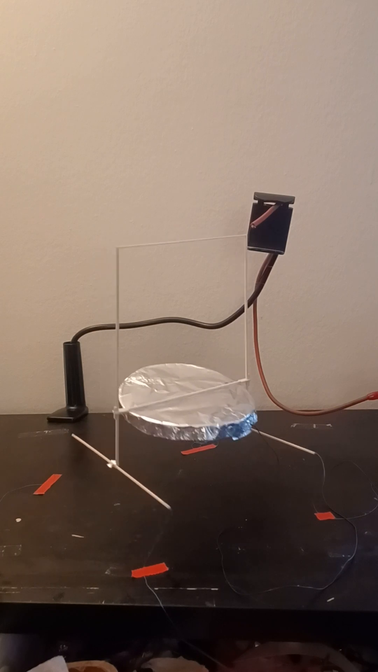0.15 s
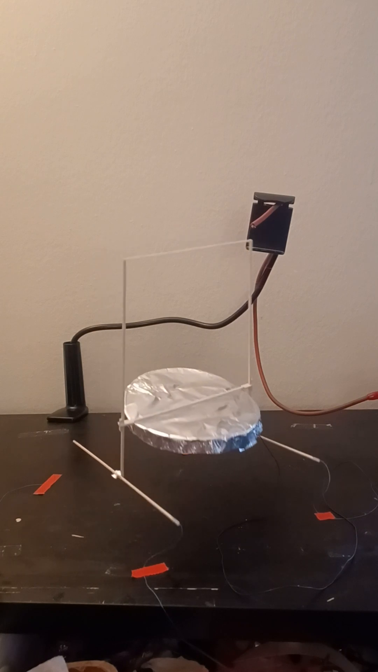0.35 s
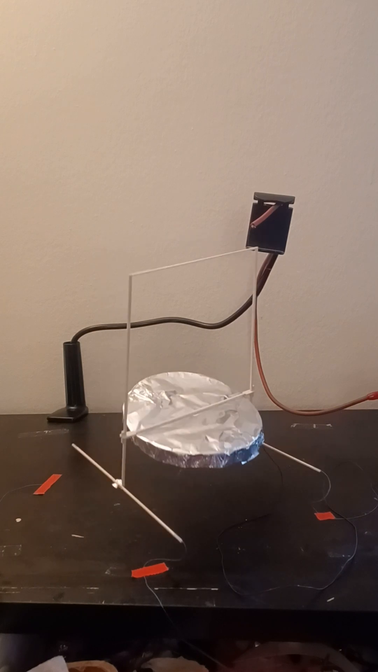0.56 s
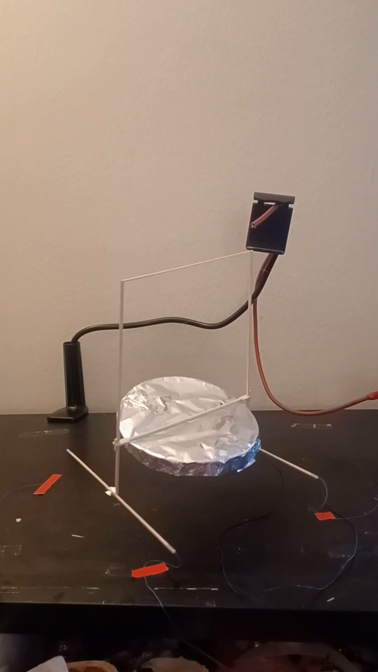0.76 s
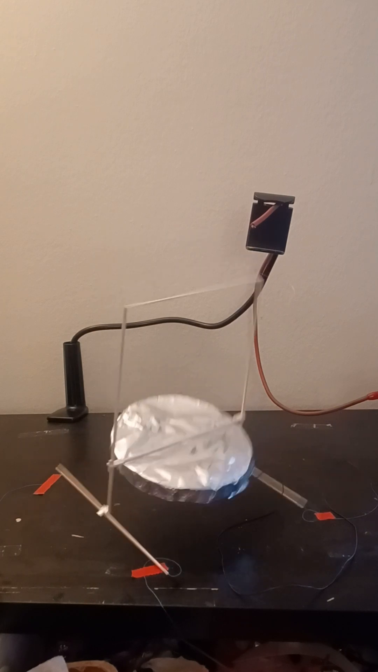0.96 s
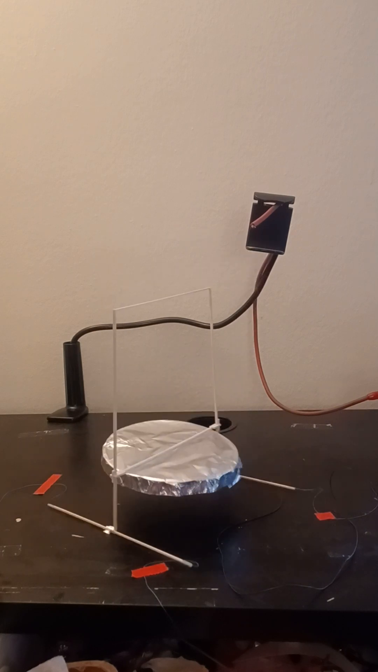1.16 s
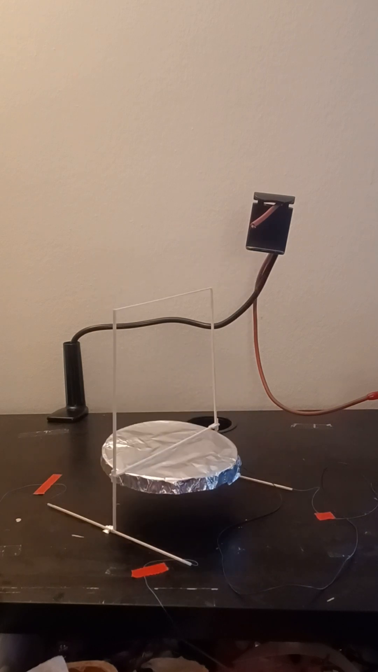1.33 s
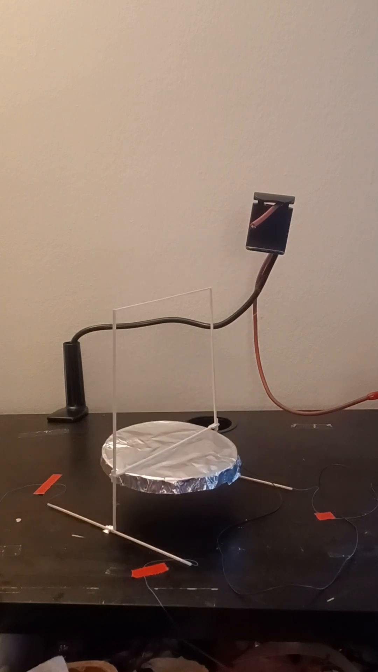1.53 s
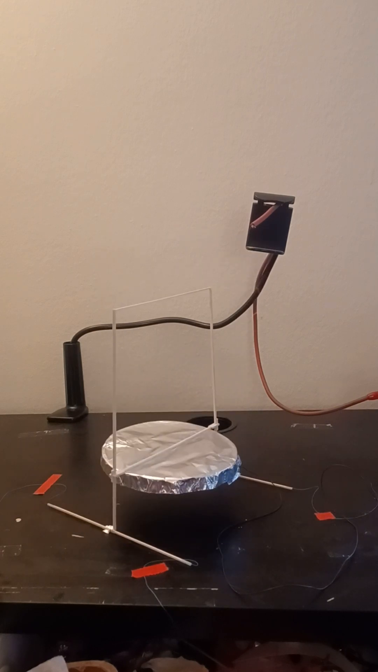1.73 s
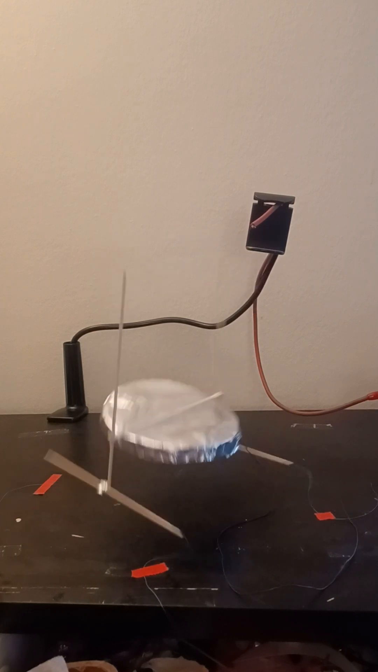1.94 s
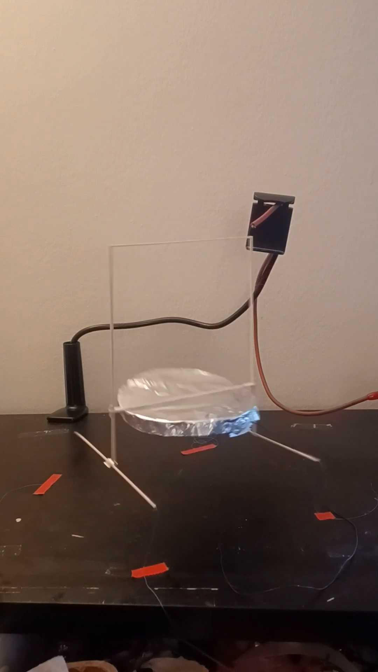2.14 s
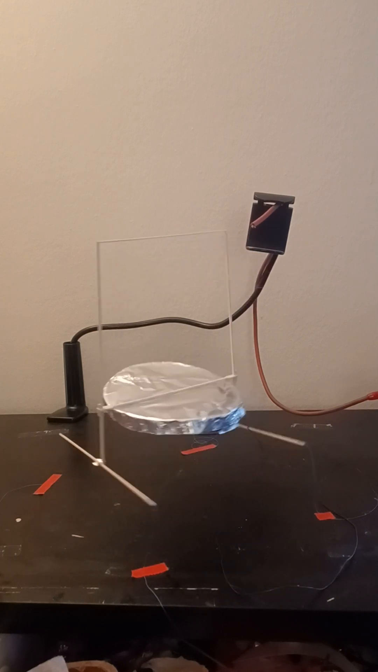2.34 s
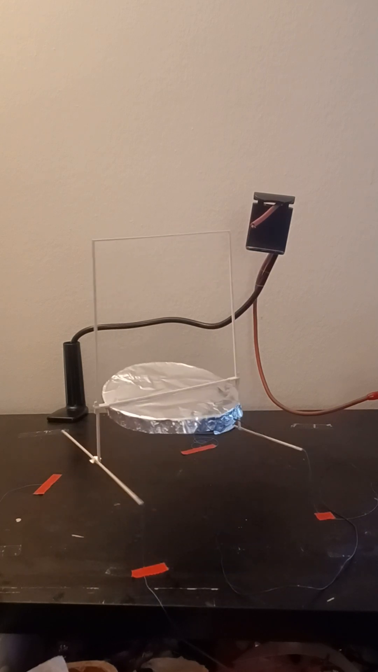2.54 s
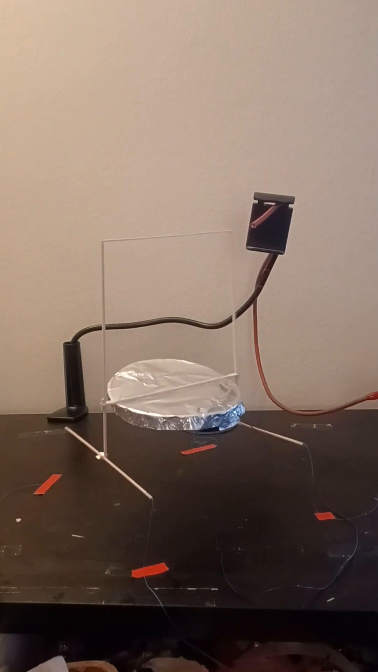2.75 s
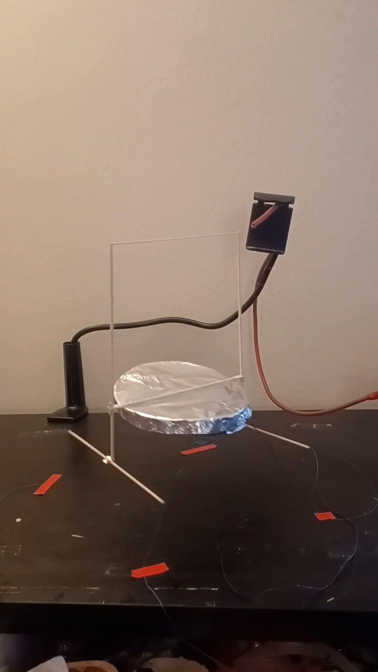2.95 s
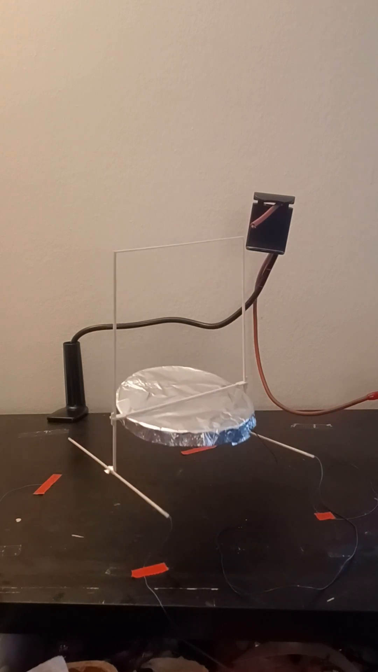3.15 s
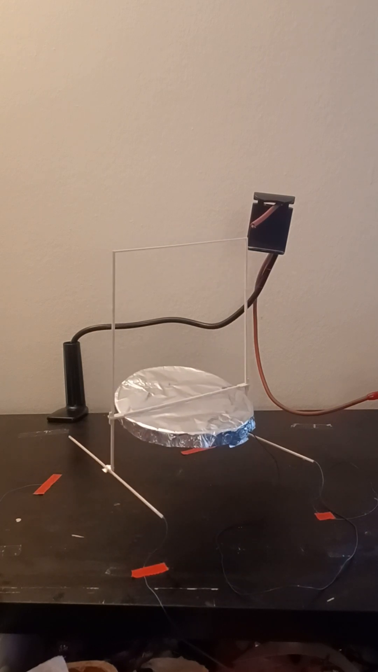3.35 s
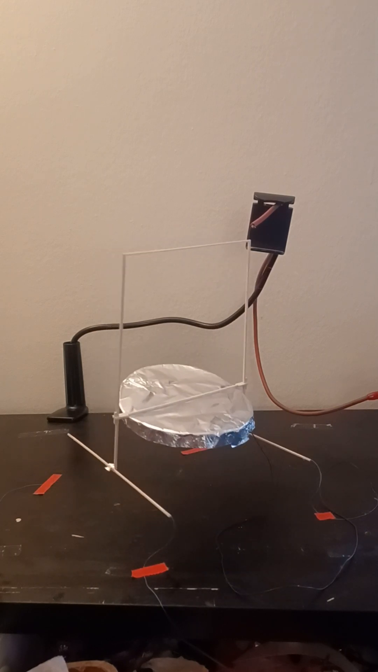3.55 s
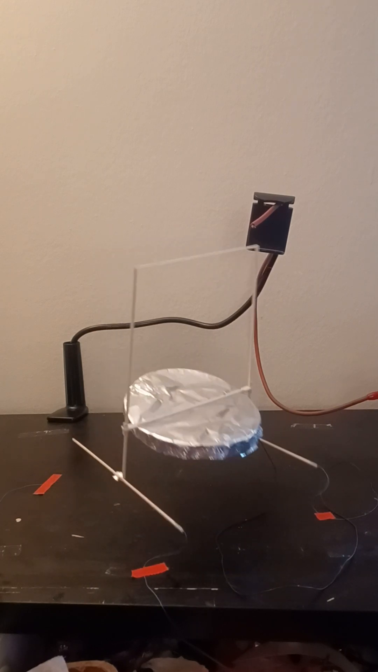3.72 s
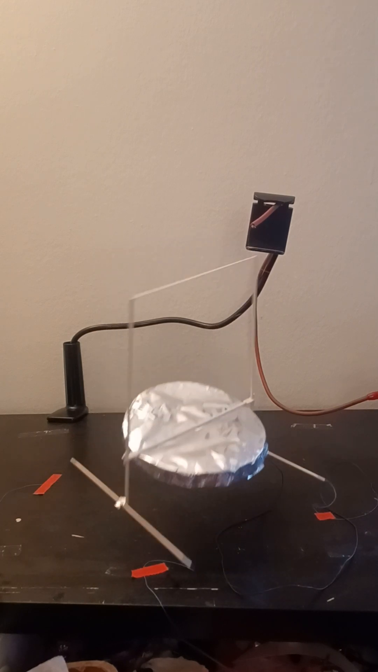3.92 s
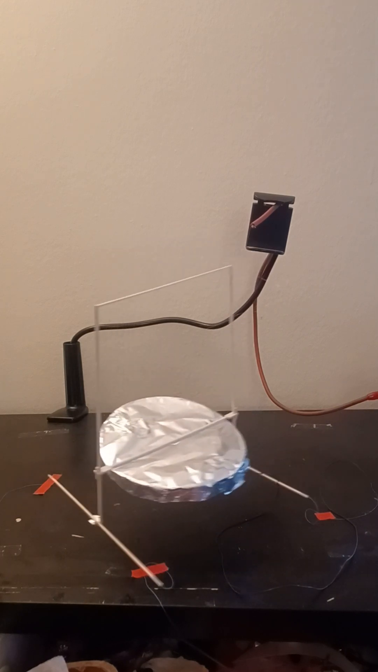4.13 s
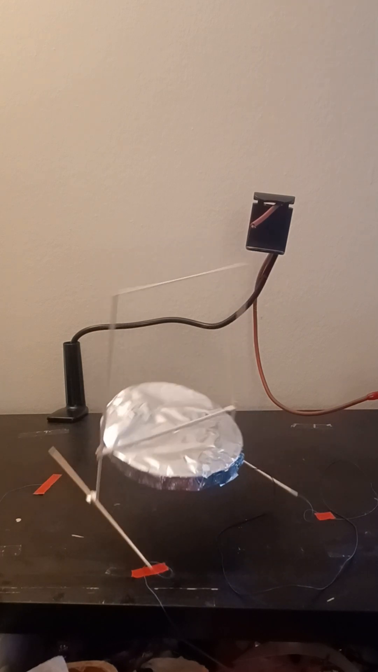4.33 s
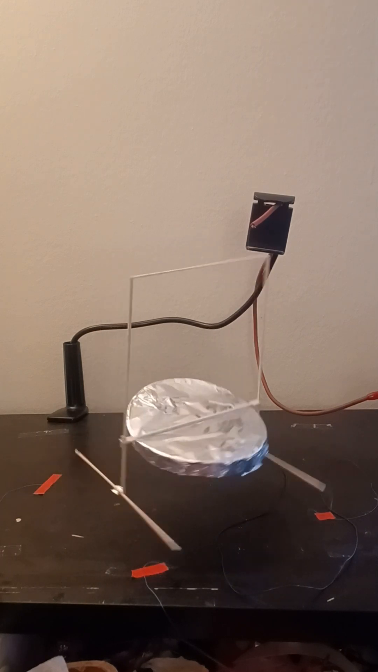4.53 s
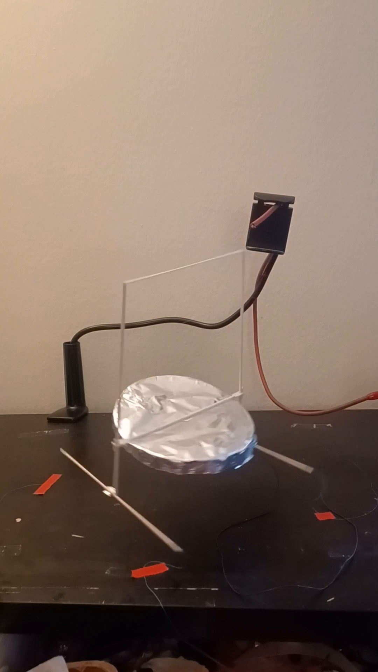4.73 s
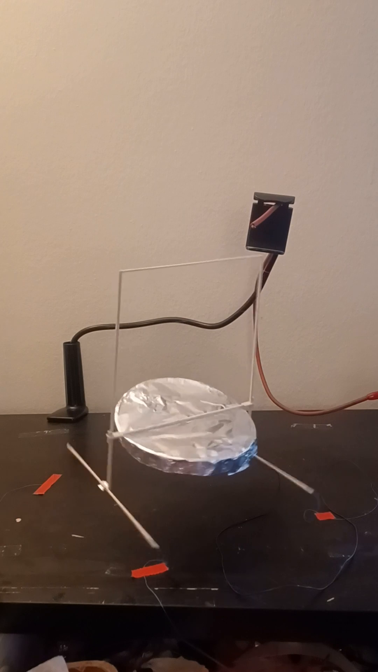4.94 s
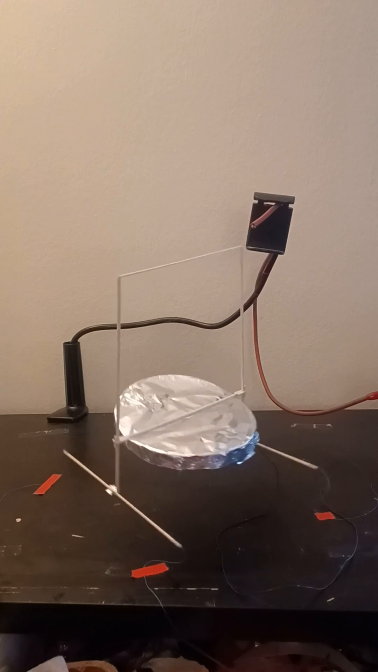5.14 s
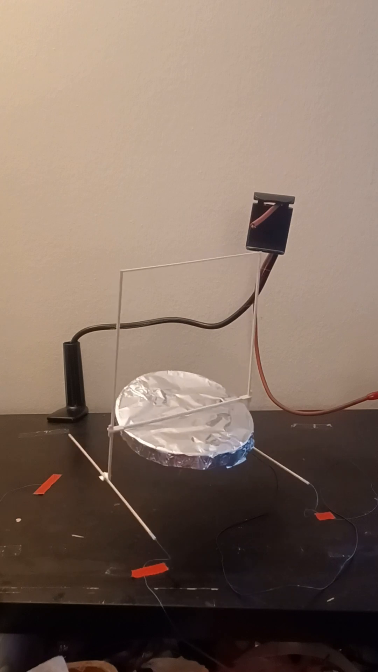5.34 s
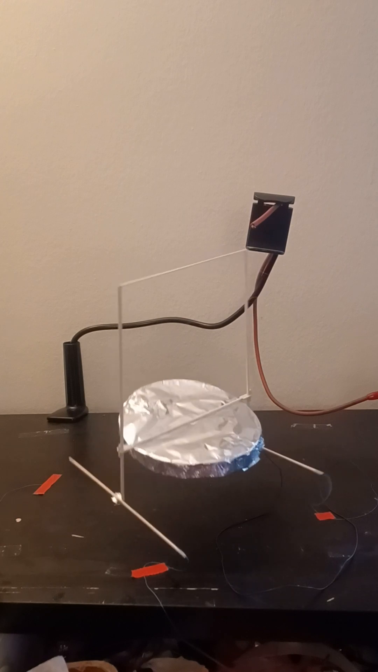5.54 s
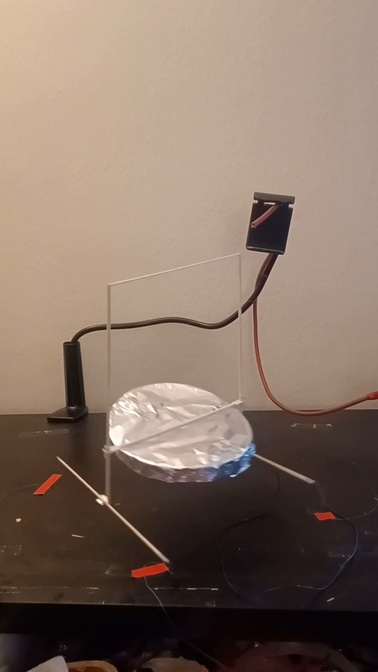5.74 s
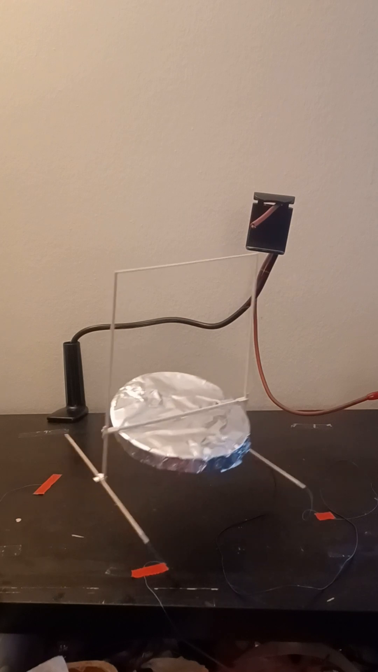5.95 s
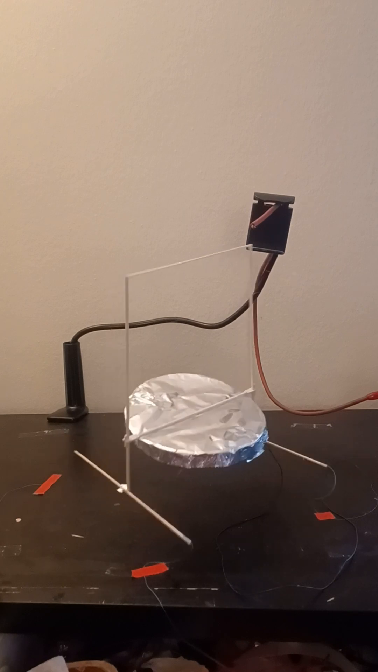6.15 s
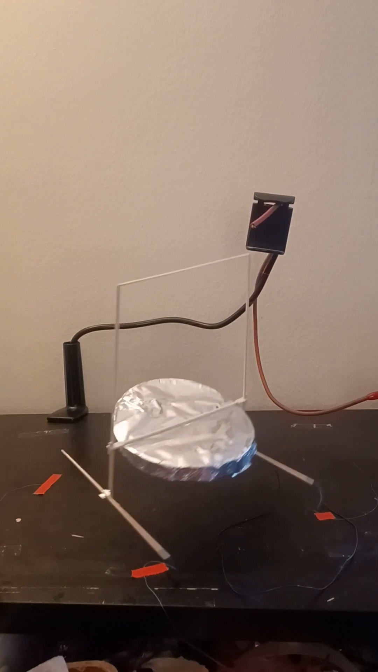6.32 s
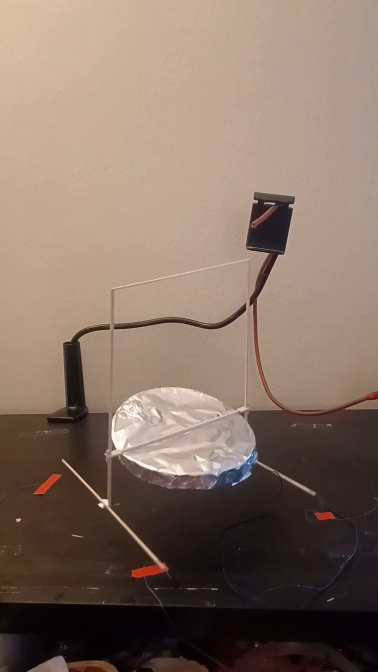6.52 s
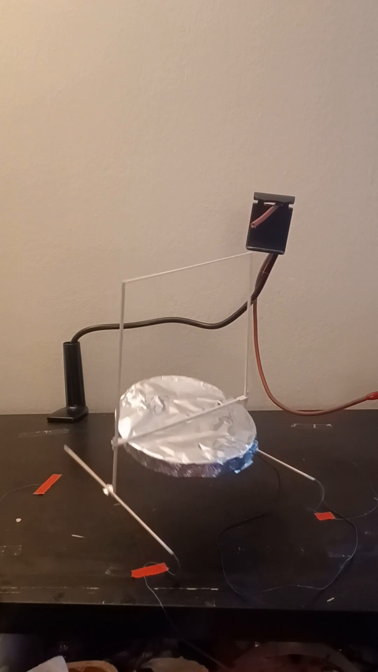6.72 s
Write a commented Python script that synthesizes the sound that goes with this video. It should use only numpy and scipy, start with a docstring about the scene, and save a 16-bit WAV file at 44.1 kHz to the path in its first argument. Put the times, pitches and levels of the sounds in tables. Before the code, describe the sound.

In a small room, a foil craft over a workbench gives off a dense, bright corona hiss. The hiss drops and thins, a light foot tap and brief scrape follow, then a sharp fizzing snap as it lands. A faint fizz fades into near silence with low room rumble. A tiny tick and thin sizzle come before the hiss jumps back and stays to the end. Close stereo microphones, slightly brighter on the left.

```python
"""A foil ion lifter hovers over a workbench in a small room, hissing: dense random micro-discharges, filtered.
The voltage sags, a foot taps and scrapes the bench, and the craft lands with a fizzing snap, all clouds of clicks.
A thin leak of charge fades into a near-silent pause; then the supply ticks on, sizzles, and the hiss returns.
Soft rustles are resonant noise swells. Behind lie filtered-noise room rumble and idle hiss, and mains-hum sines.
Two microphones hear the craft directly, by near echoes off bench and wall, and through the room's tail."""
import sys
import numpy as np
from scipy import signal
from scipy.fft import rfft, irfft, next_fast_len
from scipy.io import wavfile

SR = 44100
rng = np.random.default_rng(int(sys.argv[2]) if len(sys.argv) > 2 else 0)


def generate_wav(signal):
    """Clip the signal to [-1, 1] and save it as 16-bit WAV at the path in sys.argv[1]."""
    frames = np.transpose(np.atleast_2d(signal))
    scaled = np.clip(frames, -1, 1) * 32767
    pcm = np.round(scaled).astype(np.int16)
    wavfile.write(sys.argv[1], SR, pcm)


N = 303408
TIME, FREQ = np.arange(N) / SR, np.fft.rfftfreq(N, 1 / SR)  # s, Hz

# Spectral shapes of the sources; only the shape counts: (frequency [Hz], level [dB])
CORONA_BODY_SPECTRUM = [(260, -44), (450, -24.5), (539, -21), (755, -23), (1180, -16.5), (1300, -17.5),
                        (1460, -13), (1570, -12), (1910, -6.5), (2430, -10), (3570, -4.5), (3840, -2.5),
                        (5780, -1.5), (6290, 5), (8000, -12), (10400, -19.5), (17600, -120)]
CORONA_FIZZ_SPECTRUM = [(4410, -42.5), (7500, -22), (8270, -17), (13100, 1), (14600, 3), (15300, 5),
                        (16000, -13)]
FOOT_TAP_SPECTRUM = [(180, -52), (300, -22), (1120, -16), (1460, -1.5), (1870, -9), (2480, -7.5),
                     (3400, -15), (4090, -16), (4520, -23.5), (4990, -13), (6850, -16), (11100, -26),
                     (14200, -11), (16000, -31)]
SNAP_SPECTRUM = [(76, -48), (130, -18), (248, -16), (589, -13), (829, -8.5), (1010, -12), (1750, -7),
                 (3130, -10.5), (3610, -3.5), (5500, -8), (6090, -4), (7440, -11.5), (11800, -5.5),
                 (13900, 3.5), (16000, -3.5)]
SUPPLY_TICK_SPECTRUM = [(800, -6), (2000, -20), (6000, 2), (8000, -8), (11000, -3), (15000, -2)]
ROOM_RUMBLE_SPECTRUM = [(25, -33), (50, -21.5), (60, -1), (75, -8), (105, -2), (140, -1.5), (195, -3.5),
                        (225, -0.5), (290, -7.5), (400, -13), (700, -18.5), (1200, -30), (3000, -58)]
IDLE_HISS_SPECTRUM = [(710, -35), (1200, -5), (1310, -13), (1890, -12), (3250, -17), (3700, -15),
                      (5180, -13.5), (5900, -3), (7660, -14), (9410, -15.5), (12500, -14), (14500, 3.5),
                      (16000, -9)]
# Resonances and one broad dip in the hiss body: (frequency [Hz], full width at half the dB [Hz], lift [dB])
BODY_RESONANCES = [(1487, 40, 6), (1700, 15, 5), (1949, 22, 3), (2550, 62, 3.5), (3190, 210, 2.5),
                   (3437, 35, 7.5), (3773, 38, 6), (4070, 23, 3), (4480, 40, 5), (4914, 40, 5.5),
                   (6090, 36, 3.5), (6330, 580, -4.5)]
# Soft rustles and bumps as the craft moves:
# (centre time [s], Gaussian sigma [s], frequency [Hz], half-width at half amplitude [Hz], level [dB])
CRAFT_RUSTLES = [(0.975, 0.034, 2060, 260, -59), (0.955, 0.011, 4850, 1500, -53.5),
                 (0.997, 0.033, 653, 280, -69), (2.146, 0.031, 970, 150, -61.5),
                 (2.24, 0.13, 1020, 250, -69), (2.3, 0.27, 159, 50, -71), (2.54, .04, 190, 60, -66),
                 (2.787, 0.06, 227, 24, -65), (3.07, 0.039, 973, 50, -63.5)]
# Mains lines: (frequency [Hz], rms level [dB])
MAINS_LINES = [(59.9, -89.5), (119.8, -74.5)]
# Left microphone minus right: (frequency [Hz], level difference [dB])
HISS_BALANCE = [(700, 1.5), (1250, 10), (1700, 3.5), (3000, 0.5), (4800, 0), (6600, 6.5), (8000, 2.5),
                (11000, 8.5), (13000, 11), (15000, 15)]
SNAP_BALANCE = [(200, 0.5), (800, 1), (1700, 5), (4200, 0), (6300, 4.5), (7500, 5), (11000, 9), (14500, 14)]
IDLE_BALANCE = [(500, 2.04), (4000, 1), (6300, 8), (8000, 4), (11000, 9), (15000, 19)]
# Reverberation of the small room: (frequency [Hz], time to fall 60 dB [s])
ROOM_DECAY = [(200, 0.31), (1400, 0.38), (3000, 0.34), (6000, 0.34), (10000, 0.2), (15000, 0.18)]
# Near echoes off bench and wall, relative to the direct sound: (nominal delay [s], level [dB])
NEAR_ECHOES = [(.0009, -7), (.0026, -5.5), (.0051, -3), (.0067, -7)]

SPOT_COUNT = 4  # sounding spots on the craft
OFF_S, FALL_S = 1.1, .01  # midpoint and time scale of the corona going out
ON_S, RISE_S = 1.8215, .0012  # midpoint and time scale of the corona striking
HISS_DB, BODY_DB = -38, -8.5  # fizz before room and balance; body relative to fizz
SAG_S, SAG_LENGTH_S, SAG_DB = 0.82, 0.07, 11.5  # the voltage first drops quickly
DRAIN_DB_PER_S = 14  # then drains slowly
CLIMB_DB, CLIMB_S = 2.6, 0.042  # on striking the fizz starts this far down; settling time constant
BODY_LAG = 1.7  # the body climbs this many times as far, in dB
CREEP_DB_PER_S = 0.1443  # once struck, the discharge slowly grows
EDGE_HZ = 15850  # recorder's upper band edge


def corona(flutter_db=0.7, per_s=24000):
    """Countless micro-discharges along the wire make a high fizz and a lower body, both following the voltage."""
    quick_drop = SAG_DB * np.clip((TIME - SAG_S) / SAG_LENGTH_S, 0, 1)
    slow_drain = DRAIN_DB_PER_S * np.maximum(TIME - SAG_S - SAG_LENGTH_S, 0)
    going_out = (1 - np.tanh((TIME - OFF_S) / FALL_S)) / 2
    dying = gain_of(-quick_drop - slow_drain) * going_out

    since_on = np.maximum(TIME - ON_S, 0)
    climb_db = CLIMB_DB * np.exp(-since_on / CLIMB_S)
    striking = (1 + np.tanh((TIME - ON_S) / RISE_S / 2)) / 2
    struck = gain_of(CREEP_DB_PER_S * since_on) * striking

    # the discharge is never quite steady
    level = gain_of(HISS_DB + flutter_db * flutter(slow_hz=6.2, fast_hz=60))
    resonance_db = sum(db / (1 + (2 * (FREQ - hz) / width) ** 2) for hz, width, db in BODY_RESONANCES)

    # body and fizz come from the same discharges
    pulses = sparks(per_s)
    body = evened(colour(pulses, read(CORONA_BODY_SPECTRUM, FREQ) + resonance_db))
    body = body * gain_of(BODY_DB) * (dying + struck * gain_of(-BODY_LAG * climb_db))
    fizz = evened(colour(pulses, read(CORONA_FIZZ_SPECTRUM, FREQ)))
    fizz = fizz * (dying + struck * gain_of(-climb_db))

    body_in_room = room(level * body, wet_db=3.0, build_s=0.0023)
    fizz_in_room = room(level * fizz, wet_db=5.5, build_s=0.0028)
    return placed(body_in_room + fizz_in_room, HISS_BALANCE)


def landing(tap_db=-34.5, scrape_db=-47.0, snap_db=-26.5):
    """A foot taps and scrapes the bench; then the foil comes down and its charge goes in a fizzing snap."""
    tap = gain_of(tap_db) * burst(FOOT_TAP_SPECTRUM, 1.0666, hold_s=0.00091, decay_s=0.0079)
    scrape = gain_of(scrape_db) * burst(FOOT_TAP_SPECTRUM, 1.072, hold_s=.03, decay_s=.02)
    snap = gain_of(snap_db) * burst(SNAP_SPECTRUM, 1.0974, hold_s=0.017, decay_s=0.028)
    foot_in_room = room(tap + scrape, wet_db=6.5, build_s=0.00204)
    snap_in_room = room(snap, wet_db=5.5, build_s=0.0076)
    return placed(foot_in_room + snap_in_room, SNAP_BALANCE)


def leak(leak_db=-63.0):
    """What charge is left after the snap leaks away in a thin, fading fizz."""
    fizz = gain_of(leak_db) * burst(CORONA_FIZZ_SPECTRUM, 1.16, hold_s=0.084, decay_s=0.15)
    return placed(room(fizz, wet_db=4.0, build_s=.002), IDLE_BALANCE)


def switch_on(tick_db=-48.5, sizzle_db=-63.0):
    """A tick as the supply starts, and a thin sizzle while the voltage climbs."""
    tick = gain_of(tick_db) * burst(SUPPLY_TICK_SPECTRUM, 1.7974, hold_s=.0008, decay_s=.002)
    sizzle = gain_of(sizzle_db) * burst(SUPPLY_TICK_SPECTRUM, 1.8, hold_s=.03, decay_s=0.01)
    return placed(room(tick + sizzle, wet_db=9.0, build_s=.003), HISS_BALANCE)


def rustles(left_db=1.5, apart=0.63):
    """Each is a soft swell of noise in one resonance, a little different at each microphone."""
    out = np.zeros((2, N))
    # noise common to both microphones, plus a share of each one's own
    noise = rfft(rng.standard_normal(N) + apart * rng.standard_normal((2, N)))
    for s, length, hz, width, db in CRAFT_RUSTLES:
        ringing = irfft(noise / (1 + ((FREQ - hz) / width) ** 2), N)
        swell = np.exp(-((TIME - s) / length) ** 2 / 2)
        out += gain_of(db) * evened(ringing) * swell
    return out * gain_of([[left_db], [-left_db]])  # left up, right down by as much


def background(apart=0.91, left_db=2.2, rumble_db=-68.5, idle_db=-74.5):
    """Low noise for room rumble, sines for mains hum, and a faint steady hiss heard while the corona is out."""
    noise = rng.standard_normal(N) + apart * rng.standard_normal((2, N))
    rumble = gain_of(rumble_db) * evened(colour(noise, read(ROOM_RUMBLE_SPECTRUM, FREQ)))
    rumble = rumble * gain_of([[left_db], [-left_db]])
    hum = np.zeros(N)
    for hz, db in MAINS_LINES:
        hum += gain_of(db) * np.sqrt(2) * np.sin(2 * np.pi * (hz * TIME + rng.random()))
    hiss = evened(colour(rng.standard_normal((2, N)), read(IDLE_HISS_SPECTRUM, FREQ)))
    return rumble + hum + placed(gain_of(idle_db) * hiss, IDLE_BALANCE)


def sparks(per_s):
    """Dense random trains of tiny discharges of uneven size, one train for each spot on the craft."""
    size = rng.standard_normal((SPOT_COUNT, N))
    fires = rng.random((SPOT_COUNT, N)) < per_s / SR
    return evened(size * fires)


def burst(spectrum, s, hold_s, decay_s, per_s=15000):
    """A cloud of clicks that starts at once, holds and dies away exponentially."""
    age = TIME - s
    shape = (age >= 0) * np.exp(-np.maximum(age - hold_s, 0) / decay_s)
    return evened(colour(sparks(per_s), read(spectrum, FREQ))) * shape


def flutter(slow_hz, fast_hz):
    """Slow random wander, rms 1: power flat up to slow_hz, then as 1/f, and cut steeply near fast_hz."""
    hz = np.clip(FREQ, slow_hz, None)
    shape = 1 / np.sqrt(hz) / (1 + (hz / fast_hz) ** 4)
    return evened(irfft(rfft(rng.standard_normal(N)) * shape, N))


def room(spots, wet_db, build_s):
    """Each spot is heard directly, by a few near echoes and by its own tail that dies band by band."""
    count, size = len(spots), SR // 2
    near = np.zeros((count, 2, size))
    # the direct sound reaches the left microphone four samples later
    near[:, 0, 4] = near[:, 1, 0] = 1
    for s, db in NEAR_ECHOES:
        # the delay varies with spot and microphone
        at = np.round(s * SR * rng.uniform(.85, 1.15, (count, 2, 1))).astype(int)
        np.put_along_axis(near, at, gain_of(db), 2)

    hz, t, z = signal.stft(rng.standard_normal((count, 2, size)), SR, nperseg=256)
    decay = gain_of(-60 * t / read(ROOM_DECAY, hz)[:, None])
    tail = signal.istft(z * decay, SR, nperseg=256)[1][..., :size]
    tail = tail * (1 - np.exp(-TIME[:size] / build_s))
    # wet_db is the tail's average energy relative to the direct sound
    paths = near + gain_of(wet_db) * evened(tail) / np.sqrt(size)

    full = next_fast_len(N + size, real=True)
    heard = (rfft(spots, full)[:, None] * rfft(paths, full)).sum(0)
    # level set by the total energy of the left microphone's paths
    return irfft(heard, full)[:, :N] / np.linalg.norm(paths[:, 0])


def placed(x, balance):
    """Shares each band between the two microphones, keeping the sum of their power gains constant."""
    db = read(balance, FREQ)
    power_db = 10 * np.log10((gain_of(db) + gain_of(-db)) / 4)
    return colour(x, np.array([db, -db]) / 2 - power_db)


def colour(x, db):
    """Filters x by a gain in dB at every frequency."""
    return irfft(rfft(x) * gain_of(db), N)


def read(points, hz):
    """Reads a table of (frequency [Hz], value), joined on a log-frequency axis."""
    f, value = np.transpose(points)
    return np.interp(np.log(hz + 1), np.log(f + 1), value)


def evened(x):
    """Scales the whole of x to rms 1."""
    return x / np.sqrt(np.mean(x ** 2) + 1e-20)


def gain_of(db):
    """Amplitude gain of a level in dB."""
    return 10 ** (np.asarray(db) / 20)


def scene():
    """The craft and its supply on the bench, in front of the room's background."""
    return corona() + landing() + leak() + switch_on() + rustles() + background()


def record(dry):
    """The recorder's band limit: a linear-phase low-pass."""
    lowpass = signal.firwin(511, EDGE_HZ, window=("kaiser", 9), fs=SR)
    return signal.oaconvolve(dry, lowpass[None], "same")


dry = scene()
out = record(dry)
generate_wav(out)
```